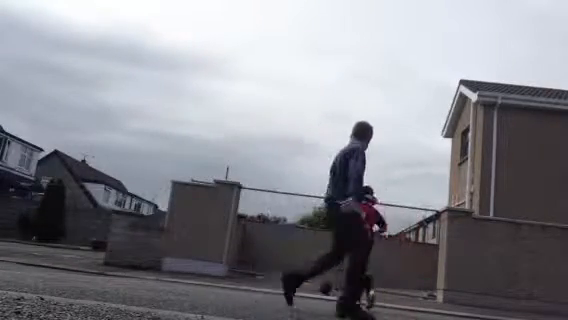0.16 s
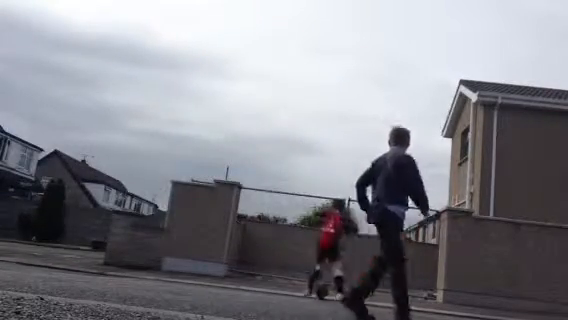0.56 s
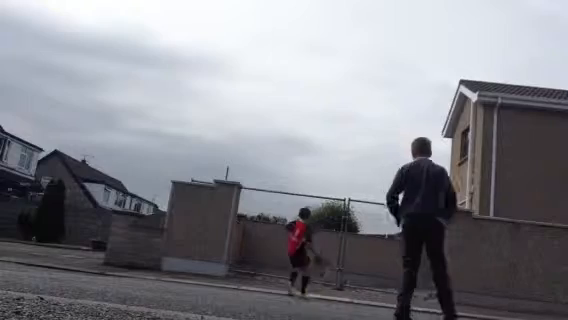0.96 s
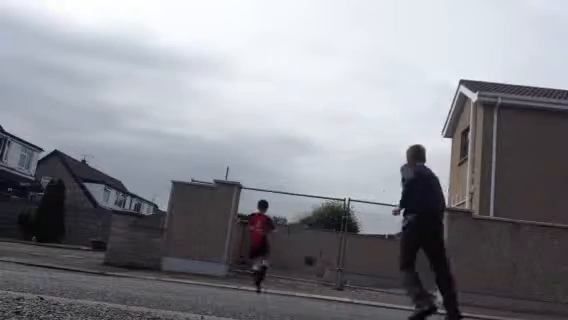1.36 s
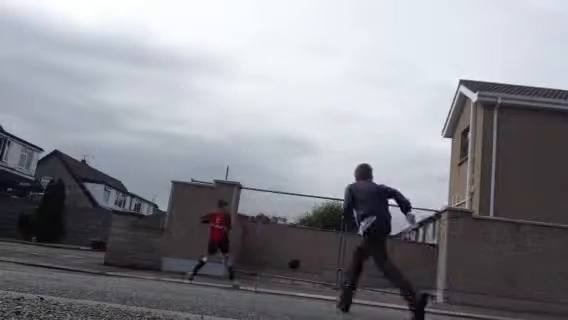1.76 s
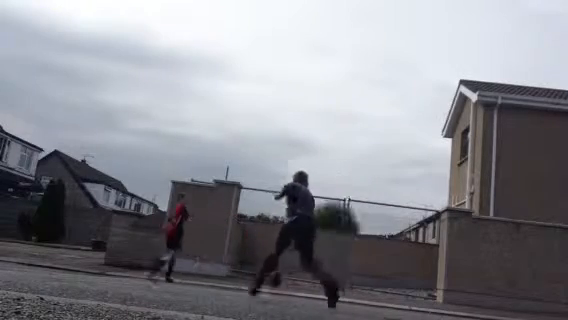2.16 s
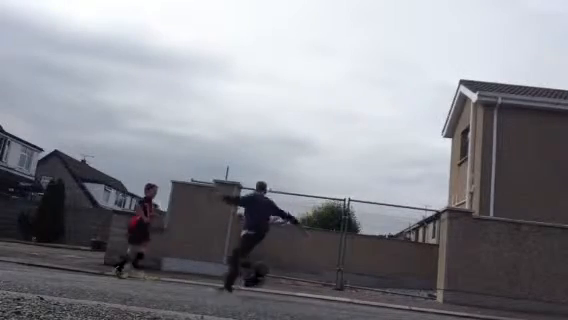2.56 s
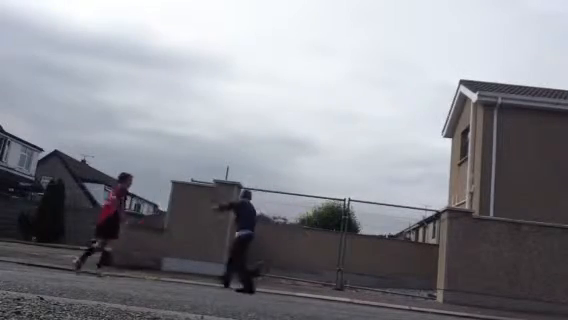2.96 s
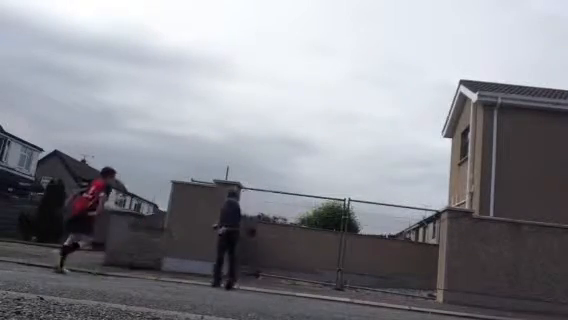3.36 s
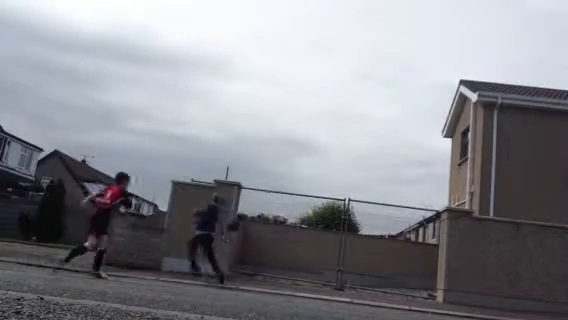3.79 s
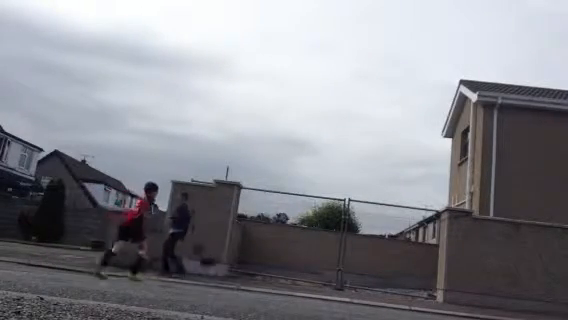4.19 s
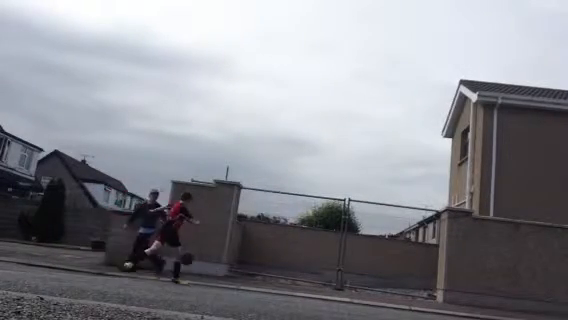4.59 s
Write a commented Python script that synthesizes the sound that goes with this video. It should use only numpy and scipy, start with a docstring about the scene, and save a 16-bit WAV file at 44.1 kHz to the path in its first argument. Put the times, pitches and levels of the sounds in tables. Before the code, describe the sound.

Footsteps and hard ball kicks echo off street walls, while a wire mesh fence bursts into loud, sizzling rattles that slowly fade.

```python
"""A loose welded-wire fence panel, struck twice by a ball, rattles on as a bright hiss over ringing tones:
random wire contacts excite the bending modes of the wire spans and the heavier frame.
The ball, kicked about in a paved yard, sounds as decaying modes and noise; delayed knocks return from two
walls, with a scattered tail. Feet thump as low decaying sines and tap as short noise bursts.
Shaped noise makes the distant traffic and air."""
import sys
import numpy as np
from scipy import signal
from scipy.fft import rfft, irfft, next_fast_len
from scipy.io import wavfile

SR = 44100
rng = np.random.default_rng(int(sys.argv[2]) if len(sys.argv) > 2 else 0)


def volts_from_db(level):
    """Convert decibel levels to linear amplitude ratios."""
    exponent = np.asarray(level, float) / 20
    return 10 ** exponent


def dump(signal):
    """Clip the signal to [-1, 1] and save it as 16-bit WAV at the path in sys.argv[1]."""
    limited = np.clip(np.atleast_2d(signal).T, -1, 1)
    pcm = np.round(limited * 32767).astype(np.int16)
    wavfile.write(sys.argv[1], SR, pcm)


N = 208725


def fence():
    """Random impact excitation: thousands of wire contacts a second drive the wire modes and the frame."""
    # Wires slapping together. Each row: start in seconds, relative level in dB.
    wire_slaps = [(0.1979, -41), (0.736, -30), (0.7986, -33), (1.0959, -31.5), (1.3094, -10), (1.3593, -13),
                  (2.31, -25), (2.398, -19), (3.181, -28), (3.2766, -15), (3.306, -14), (3.3584, -12.5),
                  (3.37, -14.5), (3.4137, -11.5), (3.4292, -11), (3.446, -13), (3.4748, -12), (3.506, -15),
                  (3.551, -17), (3.685, -15.5), (3.7468, -12), (3.875, -18), (4.0565, -21), (4.1937, -18.5),
                  (4.3454, -25), (4.3994, -32)]
    # Bending modes of the short wire spans. Each row: frequency in Hz, bandwidth in Hz, relative level in dB.
    short_spans = [(2221.5, 25.4, 8), (2273, 34, 4), (2130, 114, -6.5), (3760, 580, -10.5), (6255, 39, 4),
                   (6200, 84, 0), (6398, 75, 7.5), (6640, 260, -7.5), (6400, 150, -19), (7250, 44, -17),
                   (8540, 46, -13), (12200, 110, 1), (12600, 160, -13.5), (12330, 230, -8),
                   (13050, 440, -5)]
    # Bending modes of the long wire spans. Each row: frequency in Hz, bandwidth in Hz, relative level in dB.
    long_spans = [(11640, 560, -9), (11900, 78, 1.5), (12260, 500, -2.5), (12220, 140, -5)]
    # Spectrum of the hiss as finally heard, thinned near 14 kHz, which is no property of the fence itself.
    # Each row: frequency in Hz, relative density in dB per Hz.
    heard_hiss_spectrum = [(3000, -58), (4500, -16.5), (5800, -13), (6300, -1.5), (9600, -7), (11000, -4.5),
                           (12300, -5.5), (13400, -38), (14000, -39), (14500, -21), (15300, -11)]
    # Spectrum of the shaken frame. Each row: frequency in Hz, relative density in dB per Hz.
    frame_spectrum = [(70, -62), (110, -34), (260, -13.5), (600, -4), (750, -19.5), (950, -6), (1200, -3.5),
                      (1560, -6.5), (2600, -2), (3900, -7.5), (5000, -15.5), (7000, -27)]

    rattle_db = shaking_db()
    level_db = rattle_db + 1.01 * drift(11.2) + 0.097 * drift(170.0)
    slap_s, slap_db = np.transpose(wire_slaps)
    slap_t60 = np.full(len(slap_s), 0.058)

    contacts_per_s = 9000.
    sizes = volts_from_db(2.66 * np.minimum(rng.exponential(1, N), 5)) * rng.choice([-1, 1], N)
    contacts = rms_one(sizes * (rng.random(N) < contacts_per_s / SR))

    # Long spans gain 6.5 dB at a -20 dB rattle, and lose half a dB more per dB as it fades.
    long_db = 6.5 + .5 * (rattle_db + 20) + 1.6 * drift(11.)
    ringing = wires(contacts, short_spans) + volts_from_db(long_db) * wires(contacts, long_spans)
    high = ringing + volts_from_db(-0.5) * colour(contacts, heard_hiss_spectrum)
    slap_swell = bursts(slap_s, slap_db - 11., slap_t60, rise_s=.0005)
    shaking = np.hypot(volts_from_db(level_db - 3.), slap_swell)

    # The heavy frame takes up the shaking late, through a one-pole lag.
    frame_lag_s = 0.016
    swing = volts_from_db(level_db - 8.5 - 0.08 * (rattle_db + 22))
    keep = np.exp(-1 / (frame_lag_s * SR))
    frame_swing = signal.lfilter([1 - keep], [1, -keep], swing, zi=[keep * swing[0]])[0]
    frame = colour(contacts, frame_spectrum) * frame_swing

    # Each slap opens with a bright tick.
    tick_swell = bursts(slap_s, slap_db - 9., .3 * slap_t60, rise_s=.0004)
    ticks = tick_swell * colour(rng.standard_normal(N), heard_hiss_spectrum)
    return high * shaking + ticks + frame


def shaking_db():
    """Superposition of powers: each jolt builds up, holds and decays, while a weaker sway lingers."""
    # Jolts to the fence, the first begun before the opening, holding faintly until 0.24 s and then dying away.
    # Each row: start in seconds, relative level in dB, build-up time in seconds, held time in seconds,
    # decay in dB per second.
    fence_jolts = [(-.5, -41, .03, 0.74, 41), (.9, -52, 0.0083, 0.042, 26), (1.222, -21, 0.029, 0.16, 21.5),
                   (2.39, -42, 0.0063, 0.24, 20), (2.76, -61, .01, 0.083, 6), (3.27, -29, 0.02, .5, 18.5),
                   (4.19, -43.5, 0.0071, 0.07, 14)]
    restless_db = -50.5  # the panel is never quite still
    sway_db, sway_dying_db_per_s = -17.5, 5  # level against the jolt, and decay

    power = np.full(N, volts_from_db(2 * restless_db))
    for s, db, build_s, held_s, dying in fence_jolts:
        t = np.maximum(np.arange(N) / SR - s, 0)
        rattle = -dying * np.maximum(t - held_s, 0)
        sway = sway_db - sway_dying_db_per_s * t
        build_up = (1 - np.exp(-t / build_s)) ** 2
        power += build_up * volts_from_db(2 * db) * (volts_from_db(2 * rattle) + volts_from_db(2 * sway))
    return 10 * np.log10(power)


def wires(contacts, modes):
    """Modal resonance: every mode belongs to another span, so each hears its own shift of the contacts."""
    out = 0
    for hz, width_hz, db in modes:
        own = np.roll(contacts, rng.integers(N))
        t60 = np.log(1000) / np.pi / width_hz
        out = out + volts_from_db(db) * np.sqrt(width_hz / 1000) * rms_one(ring(own, hz, t60))
    return out


def ball():
    """Impact and modal decay: the skin cracks at touch, then slap and boom answer as the ball squashes."""
    # Ball struck or bouncing. Each row: start in seconds, squash time in seconds, relative slap level in dB,
    # boom against slap in dB, crack against slap in dB.
    strikes = [(.9036, 0.00035, -20.5, 3, 3), (1.2155, 0.00036, -18, -10, -15),
               (2.7323, 0.0062, -28.5, -8, 2.5), (2.7622, 0.00004, -12.5, -3, 2),
               (3.1659, 0.00403, -32.5, -7, -1), (3.2683, 0.0041, -29, 0.5, -4),
               (4.2151, 0.0033, -19, -1, 3)]
    # Modes of the boom, the slap and the crack. Each row: frequency in Hz, relative level in dB,
    # 60 dB decay time in seconds.
    boom_modes = [(240, -3, .06), (325, -2, .06), (520, 0, .025)]
    slap_modes = [(650, -3, .02), (1050, 0, .025), (1300, -3, .025)]
    crack_modes = [(2050, 1, .008), (3000, -5, .004), (3900, -1, .008), (5200, -4, .004), (7500, -8, .003)]

    at, squash, slap_db, boom_db, crack_db = np.transpose(strikes)
    out = walls()
    stages = ((boom_modes, boom_db, 2 * squash), (slap_modes, 0, squash), (crack_modes, crack_db, 0))
    for modes, share_db, late in stages:
        for hz, mode_db, t60 in modes:
            out -= ring(clicks(at + late, slap_db + share_db + mode_db), hz, t60)

    puff = bursts(at, slap_db + crack_db - 7., .01 + 8 * squash, rise_s=.0003)
    out += puff * rms_one(band(rng.standard_normal(N), 900., 6000.))

    # The skin flaps on after the strike.
    flap = bursts(at + squash, slap_db - 9.5, np.full(len(at), 0.09), rise_s=0.0017)
    out += flap * rms_one(band(rng.standard_normal(N), 380.0, 1840.0))

    # The yard returns a late scattered tail.
    tail = bursts(at, slap_db - 16, np.full(len(at), 0.64), rise_s=0.07)
    out += tail * rms_one(band(rng.standard_normal(N), 150., 1300.)) * volts_from_db(2.5 * drift(50.))

    # A small ball radiates no deep bass.
    return signal.sosfilt(signal.butter(2, 135, "high", fs=SR, output="sos"), out)


def walls():
    """Delayed reflection: a near wall knocks back once; the far wall repeats strike and knock."""
    # Hard strikes coming back. Each row: strike in seconds, near-wall delay in seconds,
    # far-wall delay in seconds, relative level in dB, upper knock against lower in dB.
    reflections = [(.9036, .0158, .073, -20, 4), (1.2153, .012, .054, -30, 3),
                   (2.7622, .0135, .0775, -12, -5), (4.2152, .013, .072, -31, 1)]
    # Lower and upper knock of a wall. Each row: frequency in Hz, 60 dB decay time in seconds.
    wall_knocks = [(480, .016), (930, 0.019)]
    far_loss_db, far_dull_db = -7, -17  # loss of both knocks, and further loss of the upper one

    rows = []
    for s, near_s, far_s, db, upper_db in reflections:
        for (hz, t60), near_db, far_db in zip(wall_knocks, (0, upper_db), (0, far_dull_db)):
            rows += [(s + near_s, db + near_db, hz, t60)]
            rows += [(s + far_s + late, db + far_loss_db + far_db, hz, t60) for late in (0, near_s)]
    return knocks(rows, rise_s=0.00022)


def feet():
    """Soft impact and friction: a heel pushes and rings low; a sole adds a short burst of grit."""
    # Heels landing. Each row: start in seconds, relative level in dB, frequency in Hz.
    heels = [(0.218, -29, 305), (0.239, -20.5, 219), (0.366, -35, 263), (0.44, -26, 200),
             (0.534, -33.5, 123), (0.766, -20, 201), (0.824, -34, 206), (1.1147, -17, 238),
             (1.1552, -21.5, 235), (1.665, -15, 260), (1.728, -25, 263), (2.451, -38, 256),
             (2.542, -32, 253), (2.661, -27, 233), (3.33, -34, 245), (3.757, -27.5, 334), (4.487, -36, 156),
             (4.513, -30.5, 176), (4.548, -32.5, 146), (4.566, -31, 215), (4.585, -37, 156)]
    # Soles tapping and scuffing. Each row: start in seconds, relative level in dB,
    # relative treble level in dB, 60 dB decay time of the lower band in seconds.
    soles = [(0.592, -36, -15, 0.046), (0.788, -28, -8, 0.035), (0.945, -38, -12, 0.052),
             (0.999, -29.5, 11, 0.045), (1.015, -29, 4, 0.092), (1.666, -15.5, 6, 0.03),
             (1.88, -30, -3, 0.036), (2.224, -16.5, -11, 0.049), (2.304, -25, -23, 0.12),
             (2.785, -17, -1, 0.049), (2.792, -16.5, -3, 0.041), (2.868, -36, -11, 0.047),
             (2.927, -32, 2, 0.18), (3.494, -27, -5, 0.049), (3.545, -27, 16, 0.053),
             (3.742, -29, -16, 0.21), (4.625, -33, -17, 0.068)]

    at, db, treble_db, t60 = np.transpose(soles)
    thump_t60 = 0.028
    out = knocks([row + (thump_t60,) for row in heels], rise_s=0.0031)

    # The heel grinds on the paving after it lands.
    heel_s, heel_db, _ = np.transpose(heels)
    grind = bursts(heel_s, heel_db - 19.5, np.full(len(heel_s), 0.19), rise_s=.008)
    out += grind * rms_one(band(rng.standard_normal(N), 110., 340.))

    tap = bursts(at, db - 7., t60, rise_s=.0006)
    out += tap * rms_one(band(rng.standard_normal(N), 700., 2200.))
    grit = bursts(at, db + treble_db - 16.5, 0.48 * t60, rise_s=0.0006)
    out += grit * rms_one(band(rng.standard_normal(N), 1800.0, 8700.0))
    return out


def street():
    """Stationary noise, spectrally shaped and gently lumpy: distant traffic and air."""
    # Spectrum of the background. Each row: frequency in Hz, relative density in dB per Hz.
    background_spectrum = [(18, -62), (30, -27), (252, 4), (730, -9), (996, -6), (1550, -16.5),
                           (2210, -11.5), (4700, -32.5), (6000, -51), (7800, -38), (13200, -120)]
    return volts_from_db(-51.5 + 1.74 * drift(42.0)) * colour(rng.standard_normal(N), background_spectrum)


def knocks(rows, rise_s):
    """Damped oscillation: soft pushes swell briefly and ring out at one pitch."""
    out = np.zeros(N)
    for s, db, hz, t60 in rows:
        at = int(s * SR)
        t = np.arange(min(N - at, SR // 5)) / SR
        swell = (1 - np.exp(-t / rise_s)) * volts_from_db(db + 4.5 - 60 * t / t60)
        out[at:at + len(t)] -= swell * np.sin(2 * np.pi * hz * t)
    return out


def ring(x, hz, t60):
    """Two-pole resonance: a unit click sets a decaying sine of initial height 1 ringing."""
    r, w = volts_from_db(-60 / (t60 * SR)), 2 * np.pi * hz / SR
    return signal.lfilter([0, np.sin(w)], [1, -2 * r * np.cos(w), r * r], x)


def clicks(times, db):
    """Impulse excitation: one-sample clicks at the given times in seconds."""
    out = np.full(N, 1e-18)
    out[(np.asarray(times) * SR).astype(int)] = volts_from_db(db)
    return out


def bursts(times, db, t60, rise_s):
    """Exponential decay: a sum of envelopes that rise quickly and die away, each at its own pace."""
    out = np.zeros(N)
    for s, level_db, decay in zip(times, db, t60):
        at = int(s * SR)
        t = np.arange(min(N - at, SR // 2)) / SR
        out[at:at + len(t)] += volts_from_db(level_db - 60 * t / max(decay, .005)) * (1 - np.exp(-t / rise_s))
    return out


def colour(x, spectrum):
    """Spectral shaping: weights a signal by a curve drawn on a log-frequency axis; rms 1."""
    size = next_fast_len(N)
    hz, db = np.transpose(spectrum)
    grid = np.log(np.arange(size // 2 + 1) * SR / size + 1)
    gain = volts_from_db(np.interp(grid, np.log(hz), db))
    return rms_one(irfft(rfft(x, size) * gain, size)[:N])


def band(x, low_hz, high_hz):
    """Band-pass filtering: keeps the range between two corner frequencies."""
    return signal.sosfilt(signal.butter(2, [low_hz, high_hz], "band", fs=SR, output="sos"), x)


def drift(rate):
    """Low-passed randomness: a slow fluctuation of rms 1, with its corner near rate in Hz."""
    r = np.exp(-2 * np.pi * rate / SR)
    # The first second lets the filter settle.
    return rms_one(signal.lfilter([1], [1, -2 * r, r * r], rng.standard_normal(N + SR))[SR:])


def rms_one(x):
    """Power normalisation: scales a signal to rms 1."""
    return x / np.sqrt(np.mean(x ** 2) + 1e-20)


def scene():
    """Linear superposition: the sources add in one channel."""
    return (fence() + ball() + feet() + street())[None]


def top_cut(x):
    """Nothing passes above the cut-off."""
    return signal.sosfilt(signal.butter(12, 15810, fs=SR, output="sos"), x)


def record(dry):
    """Band limitation: the microphone loses the deep bass and the very top."""
    heard = signal.sosfilt(signal.butter(3, 80., "high", fs=SR, output="sos"), dry)
    heard = signal.sosfilt(signal.ellip(10, .5, 60, 15280, fs=SR, output="sos"), heard)
    return top_cut(heard)


dry = scene()
out = record(dry)
dump(out)
```